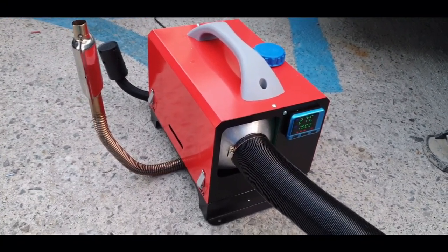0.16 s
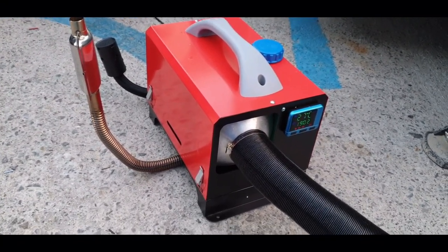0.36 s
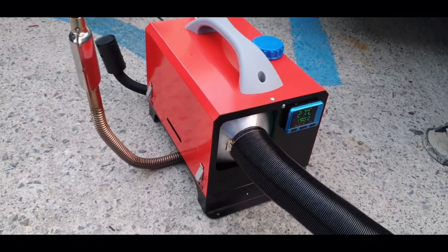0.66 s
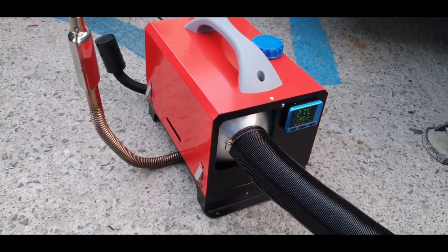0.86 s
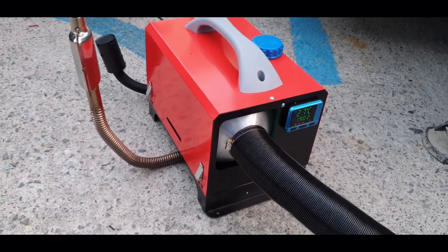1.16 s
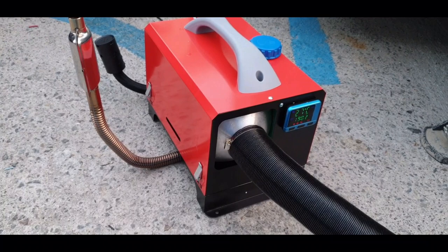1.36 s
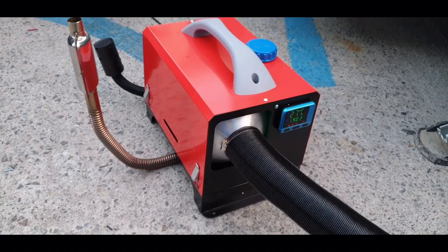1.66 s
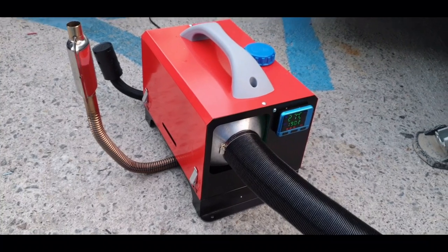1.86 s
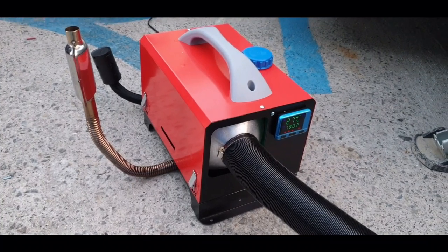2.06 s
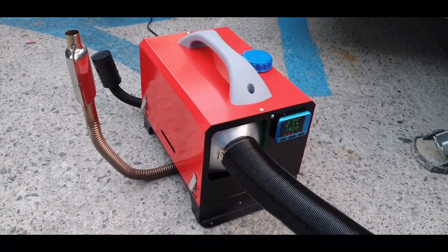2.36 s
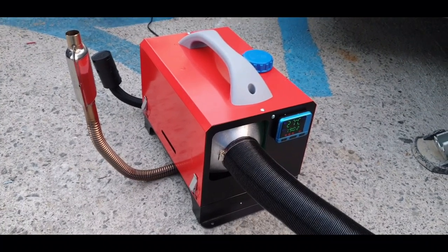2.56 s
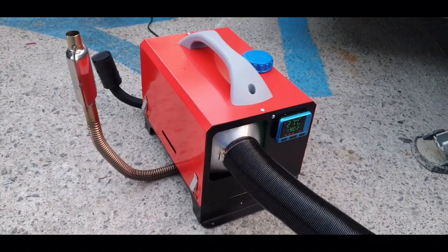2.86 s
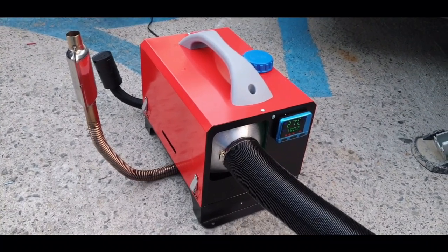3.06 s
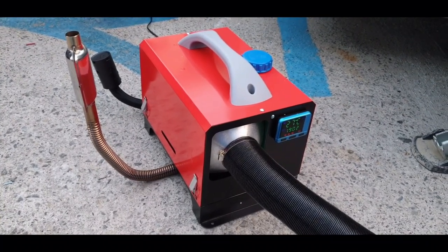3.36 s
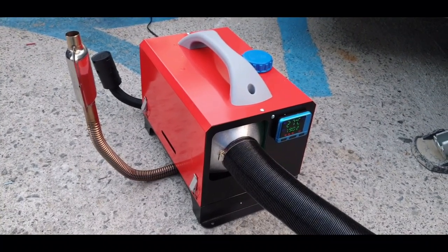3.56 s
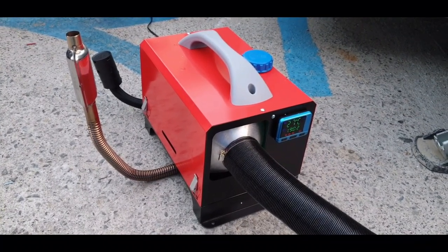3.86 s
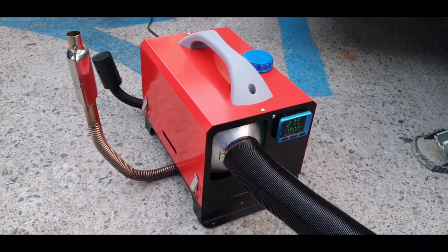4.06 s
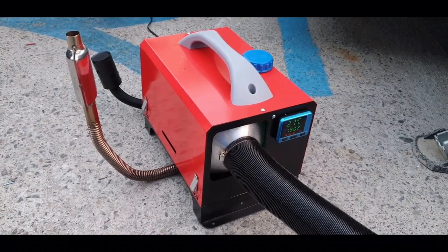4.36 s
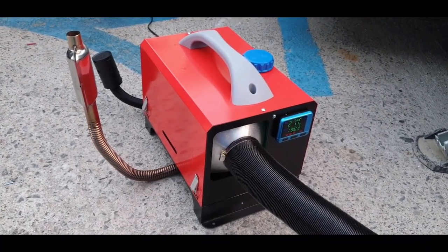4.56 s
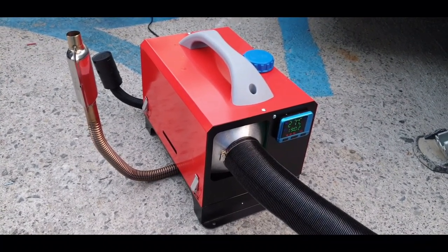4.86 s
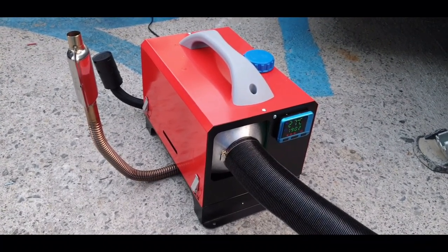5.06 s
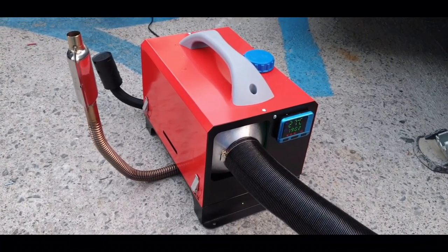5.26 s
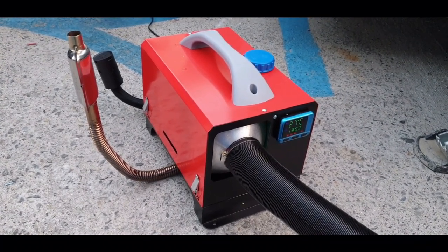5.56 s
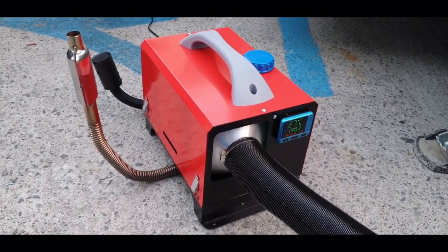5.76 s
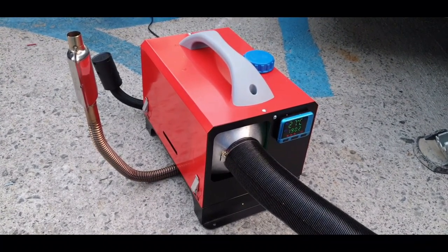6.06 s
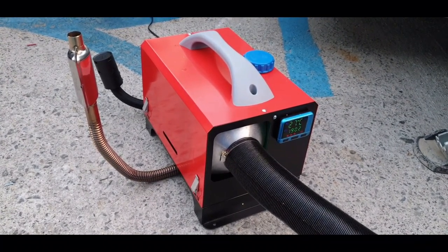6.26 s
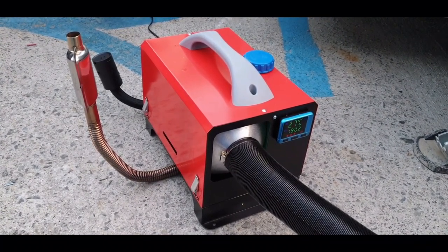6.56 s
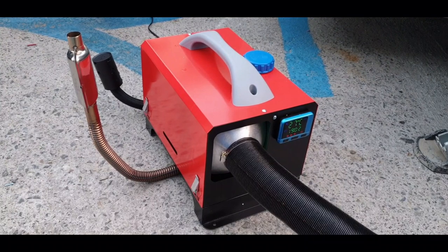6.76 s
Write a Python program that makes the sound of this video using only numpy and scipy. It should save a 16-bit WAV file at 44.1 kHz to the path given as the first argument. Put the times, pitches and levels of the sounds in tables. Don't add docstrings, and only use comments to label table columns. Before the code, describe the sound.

For about seven seconds a portable diesel heater runs outdoors, heard by a hand-held stereo microphone. A deep bass drone near 75 hertz flutters and surges irregularly, wrapped in low turbulent air and hollow duct resonance. A faint blower whine near 670 hertz stays nearly level, then creeps toward 700, softening late; a thin, high brush chirr sits to the right. Small cloth swishes and ticks appear from the start, with clearer snaps around 2.2, 2.9 and 3.2. Jacket rustling thickens from 3.6 to 4.8, mostly right, with a tiny strap squeak at 3.75 and a sharp snap at 4.7. Wind thumps the right side around 4.7-5.0, both sides around 5.6-5.9, then the right hard at 6.1. Large low buffets strike the left at 6.6-6.9 while the heater continues, without shutting off.

```python
import sys
import numpy as np
from scipy import signal
from scipy.fft import rfft, irfft, next_fast_len
from scipy.io import wavfile
from scipy.ndimage import uniform_filter1d

SR = 44100
rng = np.random.default_rng(int(sys.argv[2]) if len(sys.argv) > 2 else 0)


def invert_db(level):
    return 10 ** (np.asarray(level, dtype=float) / 20)


def unload_audio(sound):
    columns = np.transpose(np.atleast_2d(sound))
    steps = np.round(np.clip(columns, -1, 1) * 32767)
    wavfile.write(sys.argv[1], SR, steps.astype(np.int16))


N = 305157


def evened(x):
    return x / np.sqrt(np.mean(x ** 2) + 1e-20)


def read(points, hz):
    f, value = np.transpose(points)
    return np.interp(np.log(hz + 1), np.log(f + 1), value)


def curve(rows):
    time_s, value = np.transpose(rows)
    return np.interp(np.arange(N) / SR, time_s, value)


def colour(x, points):
    size = next_fast_len(N)
    return irfft(rfft(x, size) * invert_db(read(points, np.fft.rfftfreq(size, 1 / SR))), size)[..., :N]


def slow(hz):
    low = signal.butter(2, hz, fs=SR, output="sos")
    return evened(signal.sosfilt(low, rng.standard_normal(N)))


def band_noise(noise, order, low_hz, high_hz, length):
    band = signal.butter(order, [low_hz, high_hz], "band", fs=SR, output="sos")
    return evened(signal.sosfilt(band, noise)[-length:])


def flame():
    # (time [s], pitch [Hz])
    pipe_hz = [(0, 72), (.8, 74), (1.3, 78), (1.6, 74), (2.1, 75.5), (2.7, 77), (3.4, 78), (4.1, 80.5),
               (4.6, 78.5), (5.4, 81), (5.9, 78), (6.92, 76)]
    # (centre [s], peak [dB], length [s])
    surge_rows = [(.5, -36, 0.3), (.69, -28, 0.034), (.96, -35, 0.13), (1.11, -31.5, 0.11),
                  (1.21, -29.5, 0.11), (1.53, -26.5, 0.11), (1.97, -29, 0.18), (2.04, -44, 0.057),
                  (2.16, -27.5, 0.11), (2.44, -39.5, 0.26), (2.67, -27, 0.081), (3.0, -35, 0.84),
                  (3.45, -30.5, 0.44), (3.67, -29.5, 0.19), (3.81, -27.5, 0.13), (3.98, -26.5, 0.11),
                  (4.12, -28.5, 0.07), (4.28, -27, 0.087), (4.43, -25.5, 0.13), (4.73, -29, 0.16),
                  (4.9, -36.5, 0.16), (5.13, -35.5, 0.15), (5.39, -25.5, 0.085), (5.63, -34.5, 0.53),
                  (5.8, -24, 0.087), (5.92, -44, 0.041), (6.1, -30, 0.15), (6.5, -33.5, 0.084),
                  (6.71, -32, 0.035), (6.91, -28.5, 0.16)]
    idle_db, spread = -40.5, 0.7
    t = np.arange(N) / SR
    phase = 2 * np.pi * np.cumsum(curve(pipe_hz) + 2.2 * slow(5.0)) / SR
    surges = np.zeros(N)
    for k, (s, db, length_s) in enumerate(surge_rows):
        surges += (-1) ** k * invert_db(db) * np.exp(-((t - s) / (spread * length_s)) ** 2)
    tone = surges * np.sin(phase) + invert_db(idle_db) * np.cos(phase)
    tone += 0.063 * abs(surges) * np.sin(2 * phase)
    tone = np.array([np.roll(tone, -29), tone])
    flicker = uniform_filter1d(invert_db(0.3 * slow(32.0)), 600)
    return np.sqrt(2) * flicker * tone * invert_db([[-1.2], [.8]])


def blower():
    # (time [s], pitch [Hz])
    blade_hz = [(0, 673), (.5, 673.5), (1.5, 671.3), (2.5, 673.5), (3.4, 676), (4, 680), (5, 685.5),
                (6, 693), (6.92, 699)]
    # (shaft order, level [dB])
    orders = [(20, -67), (21, -55.3), (22, -68), (23, -72)]
    # (time [s], level [dB])
    blade_fade = [(0, -1), (1.5, -.5), (3, 0), (4.2, .5), (5, -1), (6, -3.5), (6.92, -5)]
    # (place in the turn [0-1], strength [dB])
    tick_rows = [(.03, -6), (.085, -3), (.17, -9), (.267, -4), (.393, -5), (.457, -5), (.535, -2),
                 (.593, 5), (.64, 3), (.703, 6), (.76, 3), (.82, -2), (.945, 0)]
    # (frequency [Hz], width [Hz], level [dB])
    holder = [(8690, 90, -7), (9190, 90, -4), (9700, 100, -4), (11010, 110, 3), (11230, 140, 0),
              (11450, 130, 5), (11580, 120, 4), (11810, 140, 3), (12100, 300, 2)]
    # (time [s], level [dB])
    brush_fade = [(0, -4), (2.8, -1), (4, -7), (6.92, -1)]
    blade_count, brush_db = 21, -69
    scatter_s, scatter_db = .00002, 2

    turns = np.cumsum(curve(blade_hz)) / SR / blade_count
    lead = np.array([[.6], [0]])
    blades = np.zeros((2, N))
    for order, db in orders:
        blades += invert_db(db + 1.5 * slow(5.0)) * np.sin(2 * np.pi * round(order) * turns + lead + order)
    blades *= np.sqrt(2) * invert_db(curve(blade_fade)) * invert_db([[.8], [-.6]])

    place, tick_db = np.transpose(tick_rows)
    when = np.interp(np.arange(int(turns[-1]))[:, None] + place - .17, turns, np.arange(N))
    early, strong = rng.standard_normal((2, *when.shape))
    at = np.clip(when + scatter_s * SR * early, 0, N - 1).astype(int)
    ticks = np.zeros(N)
    ticks[at] = invert_db(tick_db + scatter_db * strong)
    t = np.arange(900) / SR
    ring = sum(invert_db(db) * np.exp(-np.pi * w * t) * np.sin(2 * np.pi * f * t) for f, w, db in holder)
    ring *= np.minimum(t / 0.0008, 1) ** 2
    chirr = invert_db(brush_db + curve(brush_fade)) * evened(signal.oaconvolve(ticks, ring)[:N])
    return blades + np.array([np.roll(chirr, 9) * invert_db(-4.5), chirr * invert_db(8)])


def air():
    # (frequency [Hz], density [dB per Hz])
    rush = [(24, -57), (40, -11.5), (55, -6), (100, -12), (160, -22), (300, -30), (600, -37), (1400, -44),
            (3000, -53.5), (3600, -60.5), (6200, -57), (7800, -64), (11000, -60.5), (13000, -65.5)]
    # (frequency [Hz], width [Hz], level [dB], share of warming rise [0-1])
    ducts = [(54, 11, -35, 0), (75.6, 18, -36.5, 0.7), (245.6, 83, -47, 0), (289.2, 21, -50.5, 0),
             (445.5, 64, -50.5, 0.8), (697, 50, -52, 0.4), (942, 81, -56, 0.92), (1078, 16, -53, 0.99),
             (1100, 18, -52, 1.05), (1130, 80, -54, 1), (1810, 170, -63, 0.92)]
    # (time [s], rise [fraction])
    warming = [(0, 0), (1.2, .012), (2.4, .024), (4.5, .032), (6.92, .04)]
    # (centre [s], level [dB], length [s])
    lulls = [
        (.12, 0, 0.2),
        (0.953, 1, 0.25),
        (1.556, 1.5, 0.17),
        (2.23, 2, 0.38),
        (3.1, 0, 0.26),
        (5.193, -4, 0.26),
        (5.425, 1.5, 0.13),
        (6.372, -1.5, 0.15),
    ]
    # (frequency [Hz], likeness [0-1])
    likeness = [(30, .5), (52, .8), (78, .93), (110, .91), (370, .88), (700, .6), (1100, .84), (1500, .2),
                (2500, .1), (6000, 0)]
    # (frequency [Hz], left minus right [dB])
    balance = [(60, -1), (200, -3.5), (690, 2), (1270, -0.5), (2500, -4), (3800, 3.5), (5500, 5),
               (7000, 5.5), (8500, -7), (10000, 8), (12500, 3), (14600, -3)]
    # (frequency [Hz], left lead [rad])
    left_lead = [(50, .5), (78, .33), (110, .25), (400, .8), (690, .85), (950, 1.5), (1120, .75),
                 (3000, 1.1)]
    rush_db, flutter_db, lull_top_hz = -31.5, 1.2, 450

    frames, hz = N // 512 + 5, np.fft.rfftfreq(2048, 1 / SR)[:, None]
    t = np.arange(frames) * 512 / SR
    a, b, c, d, patches = rng.standard_normal((frames, 1025, 5)).T
    patches = evened(uniform_filter1d(uniform_filter1d(patches, 10, 0), 8, 1))
    rise = np.interp(t, *np.transpose(warming))

    power = invert_db(2 * read(rush, hz)) * np.ones(frames)
    power *= invert_db(2 * rush_db) / power.sum(0)
    flutter = evened(uniform_filter1d(rng.standard_normal((len(ducts), frames)), size=3, axis=1))
    for (f, width, db, share), wobble in zip(ducts, flutter):
        peak = (1 + (2 * (hz - f * (1 + share * rise)) / width) ** 2) ** -2
        power += invert_db(2.037 * (db + flutter_db * (wobble - 0.04))) * peak / peak.sum(0)
    lull_db = sum(db * np.exp(-((t - s) / (0.77 * length_s)) ** 2) for s, db, length_s in lulls)
    lull_db = lull_db * (hz > 110) / (1 + (hz / lull_top_hz) ** 4)

    same, left = np.clip(read(likeness, hz), -1, 1), a + 1j * b
    right = same * left + np.sqrt(1 - same ** 2) * (c + 1j * d)
    right = right * np.exp(-1j * read(left_lead, hz))
    lean = invert_db(read(balance, hz) / 2)
    z = np.array([left * lean, right / lean]) * np.sqrt(power) * invert_db(1.61 * patches + lull_db)
    return 0.76 * signal.istft(z, nperseg=2048, noverlap=1536)[1][:, :N]


def wind():
    # (time [s], peak [dB], swing [Hz], swings [count])
    left_puffs = [(.05, -25, 108, 2.4), (4.94, -26, 75, 2.8), (5.624, -15.5, 153, 0.81),
                  (5.634, -30.5, 368, 4.6), (5.637, -21, 112, 3.6), (5.702, -23, 93.5, 1.3),
                  (5.843, -21.5, 104, 2.9), (5.89, -31, 178, 1.4), (6.575, -23.5, 186, 2.6),
                  (6.755, -10.5, 74, 1.5), (6.808, -9.5, 97, 0.71), (6.812, -34.5, 389, 2.8),
                  (6.845, -15.5, 62.6, 1.9), (6.89, -37.5, 77.5, 11)]
    # (time [s], peak [dB], swing [Hz], swings [count, < 0 starts as suction])
    right_puffs = [(4.674, -15.5, 77, 0.5), (4.725, -14.5, 76, 1.5), (4.751, -24, 59.7, 4),
                   (4.778, -25.5, 142, 3), (4.798, -19.5, 150, 1), (4.8086, -15.5, 105, 1),
                   (4.858, -17.5, 78.4, -1), (5.0212, -11, 94, -0.5), (5.0271, -18.5, 83, 3),
                   (5.02, -34, 400, 3), (5.043, -24, 164, 2), (5.658, -18.5, 94, 2.5),
                   (5.734, -31, 164, 7.5), (5.764, -20.5, 71.4, 4), (6.0847, -34, 640, -0.9),
                   (6.0847, -11, 340, -0.75), (6.0882, -14, 162, -0.7), (6.0922, -18.5, 281, 1.3),
                   (6.097, -5, 122, 0.5), (6.108, -14.5, 129, 2), (6.129, -25, 217, 4), (6.157, -20, 82, 4),
                   (6.196, -17, 75, 0.8), (6.229, -25, 71.4, 6), (6.256, -20, 148, 3.5),
                   (6.117, -28, 330, 5), (6.148, -25, 260, 2.5), (6.172, -31, 300, 4), (4.79, -31, 300, 6),
                   (5.67, -31, 260, 6)]
    ragged_db, ragged_share = -38.5, 0.67
    half = 3000
    out, t = np.zeros((2, N + SR)), np.arange(-half, half) / SR
    for port, puffs in enumerate((left_puffs, right_puffs)):
        for s, db, hz, swings in puffs:
            shape = np.exp(-(t * hz / (.5 * swings)) ** 2 / np.where(t > 0, 1.4, 1))
            burst = band_noise(rng.standard_normal(8000), 4, 60, 240 + 0.8 * hz, 2 * half)
            swing = np.sign(swings) * np.cos(2 * np.pi * hz * t + .4)
            puff = shape * (invert_db(db) * swing + invert_db(ragged_db + ragged_share * (db + 17.5)) * burst)
            start = round(s * SR) - half
            out[port, max(start, 0):start + 2 * half] += puff[max(-start, 0):]
    return out[:, :N]


def rubbing():
    # (time [s], level [dB])
    contact = [(0, -63), (.5, -64), (2.8, -64.5), (3.65, -59.5), (3.9, -62.5), (4.3, -54.5), (4.85, -55),
               (5.15, -63.5), (5.45, -58.5), (5.635, -59.5), (5.665, -64.5), (5.71, -60.5), (6.17, -61.5),
               (6.3, -57.5), (6.46, -55), (6.515, -62.5), (6.56, -60.5), (6.92, -56.5)]
    # (peak time [s], peak [dB], length [s, < 0 builds slowly and stops short])
    strokes = [(0, -46.5, 0.013), (0.196, -67, 0.14), (0.347, -63, 0.12), (0.6, -66.5, 0.2),
               (1.017, -61, 0.091), (1.084, -58.5, 0.068), (1.32, -63, 0.073), (1.958, -61.5, 0.15),
               (2.193, -53, 0.084), (2.907, -55.5, 0.17), (3.203, -57, 0.16), (3.365, -58, 0.24),
               (3.6, -46, .07), (3.62, -50, 0.22), (3.79, -50, 0.024), (4.028, -53, 0.2),
               (4.077, -49.5, 0.19), (4.168, -46, 0.1), (4.374, -51.5, 0.02), (4.445, -50, 0.16),
               (4.47, -42.5, 0.067), (4.58, -50, 0.12), (4.653, -46, 0.1), (4.715, -44, 0.023),
               (4.812, -53, 0.078), (5.002, -52.5, 0.25), (5.226, -55, 0.093), (5.478, -58, .04),
               (5.523, -57.5, 0.072), (5.565, -59, 0.081), (5.612, -55, 0.04), (5.802, -55, -0.065),
               (5.966, -55, 0.09), (6.05, -56, 0.025), (6.12, -60, .04), (6.225, -56.5, 0.065),
               (6.613, -54, 0.19)]
    rise_db, fall_db = 31.5, 20.5
    quiet_db = -64.5
    t = np.arange(N) / SR
    power = invert_db(2 * curve(contact))
    for s, db, length_s in strokes:
        slope_db = np.where((t < s) == (length_s > 0), rise_db, fall_db)
        power += invert_db(2 * (db - slope_db * abs((t - s) / length_s)))
    return np.sqrt(np.maximum(power - invert_db(2 * quiet_db), 0))


def jacket():
    # (frequency [Hz], density [dB per Hz])
    cloth_left = [(1500, -9.5), (2900, -9), (3550, -9.5), (4200, -11), (6300, -6.5), (9000, -9.5),
                  (12000, -8), (14500, -31)]
    # (frequency [Hz], density [dB per Hz])
    cloth_right = [(1500, -9.5), (3550, -9), (4400, -4.5), (6000, -0.5), (8000, 0), (9200, 2.5), (11500, 2),
                   (14500, -1.5)]
    slips = rng.standard_normal((2, N)) * invert_db(1.2 * rng.exponential(1, (2, N)))
    clumps_db = 1.1 * slow(60.0) + 1.2 * np.array([slow(550.0), slow(370.0)])
    slips = evened(slips) * invert_db(clumps_db) * rubbing()
    norm = np.std(colour(rng.standard_normal(N), cloth_right))
    return np.array([colour(slips[0], cloth_left), colour(slips[1], cloth_right)]) * invert_db(7.0) / norm


def cloth_snaps():
    # (time [s], peak [dB], ring [Hz])
    right_snaps = [(0.079, -47, 9800), (0.189, -44, 11000), (0.5541, -46, 11900), (1.0121, -49, 11600),
                   (1.7838, -46.5, 9700), (1.941, -44, 8200), (2.172, -41, 8000), (2.6626, -48.5, 10900),
                   (2.907, -40, 9240), (3.1977, -40.5, 10900), (3.2857, -47, 5900), (3.309, -42.5, 9200),
                   (3.3664, -40, 8900), (3.4114, -41.5, 11700), (3.5242, -45, 8650), (3.548, -43, 11200),
                   (3.572, -37.5, 8650), (3.594, -37, 12500), (3.781, -41, 7500), (4.3764, -40.5, 8700),
                   (4.442, -40, 9400), (4.467, -35, 11500), (4.596, -40, 9000), (4.7117, -29.5, 10500),
                   (5.2897, -45, 7000), (5.3532, -39.5, 11500), (5.521, -42, 11500), (5.5643, -42.5, 10900),
                   (5.9404, -43, 12900), (6.047, -39, 13100), (6.195, -40.5, 7450), (6.35, -47, 8820),
                   (6.543, -41.5, 9300), (6.761, -51, 9420), (6.818, -45.5, 9500)]
    # (time [s], peak [dB], ring [Hz])
    left_snaps = [
        (.0787, -51, 3800),
        (1.3249, -45, 11500),
        (1.95, -54, 3500),
        (3.961, -45, 5500),
        (5.4105, -46, 5540),
    ]
    faint_db, faint_lean_db, lean_per_db = -49.5, 4.5, 1.34
    ring_s, crumple_s, crumple_db = .0007, .005, -12
    out, t = np.zeros((2, N)), np.arange(900) / SR
    for snaps, side in ((right_snaps, -1), (left_snaps, .5)):
        for s, db, hz in snaps:
            lean_db = side * (faint_lean_db + lean_per_db * (db - faint_db))
            fibres = band_noise(rng.standard_normal(902), 2, .72 * hz, min(1.6 * hz, 15000), 900)
            ring = np.sin(2 * np.pi * hz * t) + 0.7 * fibres
            snap = ring * np.exp(-t / ring_s * (hz / 9000) ** 1.2)
            snap += invert_db(crumple_db) * fibres * np.exp(-t / crumple_s)
            snap *= np.minimum(t / 0.00021, 1)
            start = round((s + .0008) * SR)
            out[:, start:start + 900] += snap * invert_db(db - 3.5 + np.array([[lean_db / 2], [-lean_db / 2]]))
    return out


def squeaks():
    # (centre [s], peak [dB], pitch [Hz], length [s])
    squeak_rows = [
        (3.745, -50, 4100, .005),
        (3.971, -53, 5550, .003),
    ]
    t = np.arange(N) / SR
    tone = np.zeros(N)
    for s, db, hz, length_s in squeak_rows:
        tone += invert_db(db) * np.exp(-((t - s) / length_s) ** 2) * np.sin(2 * np.pi * hz * t)
    return tone * invert_db([[2], [-2]])


def swishes():
    # (start [s], level [dB], length [s])
    swish_rows = [
        (0, -58.5, 0.11),
        (0.105, -59, 0.25),
        (1.899, -58.5, 0.13),
        (2.328, -57, 0.2),
        (4.923, -56, 0.077),
    ]
    cloth = [(500, -25.0), (1500, -3.0), (2800, -7.0), (5000, -17.0), (9000, -25.0)]  # (Hz, dB)
    t = np.arange(N) / SR
    shape = np.zeros(N)
    for s, db, length_s in swish_rows:
        shape += invert_db(db) * np.exp(-((t - s - length_s / 2) / (0.47 * length_s)) ** 2)
    return shape * evened(colour(rng.standard_normal((2, N)), cloth))


def scene():
    heater = flame() + blower() + air()
    return heater + wind() + jacket() + cloth_snaps() + squeaks() + swishes()


def low_pass(x):
    return signal.sosfilt(signal.butter(12, 15190, fs=SR, output="sos"), x)


def record(dry):
    ported = signal.sosfilt(signal.butter(3, 31, "high", fs=SR, output="sos"), dry)
    return low_pass(ported)


dry = scene()
out = record(dry)
unload_audio(out)
```